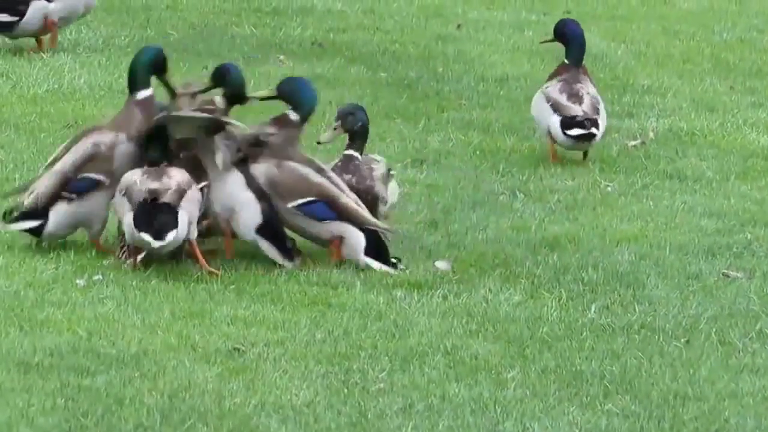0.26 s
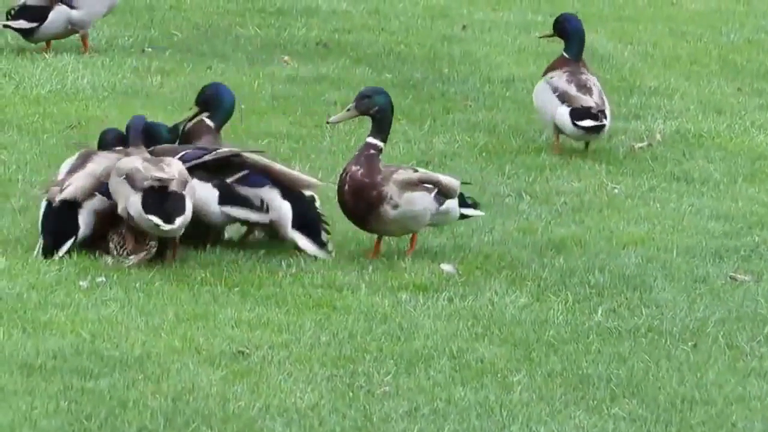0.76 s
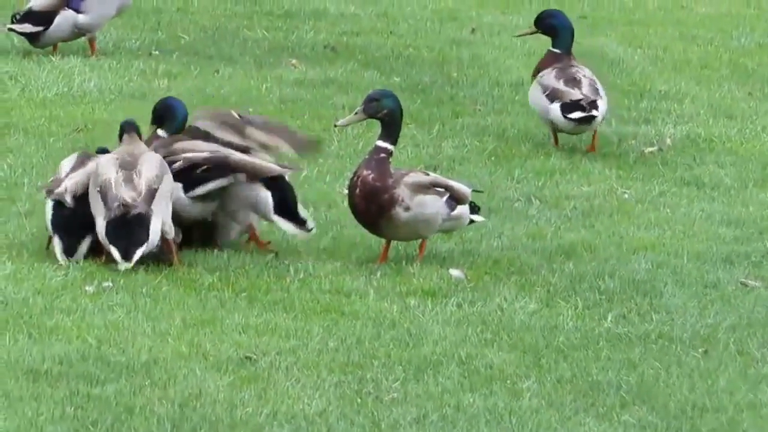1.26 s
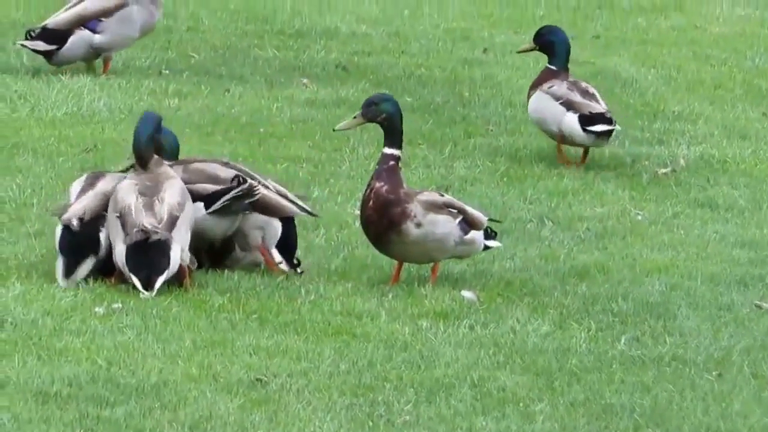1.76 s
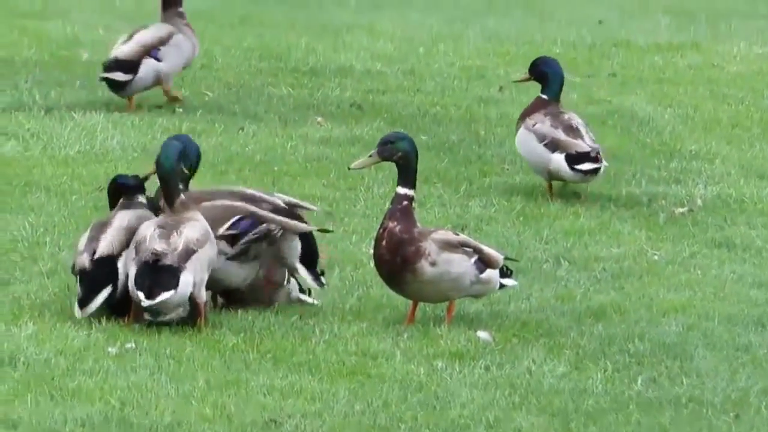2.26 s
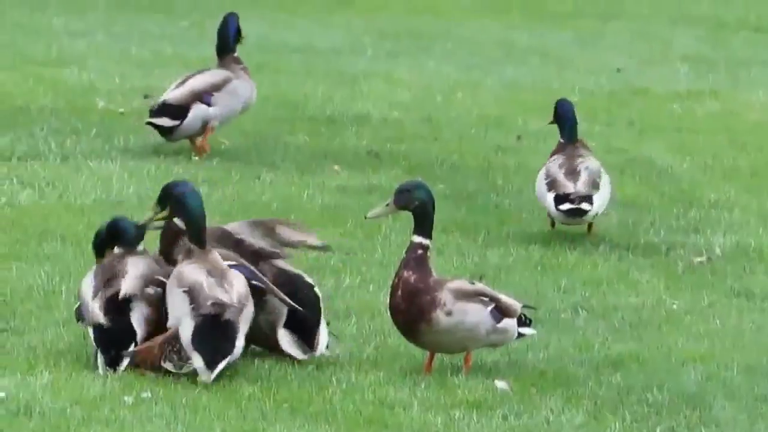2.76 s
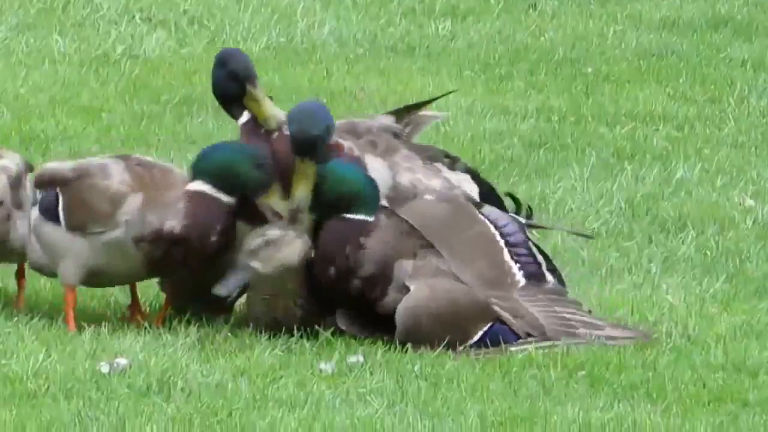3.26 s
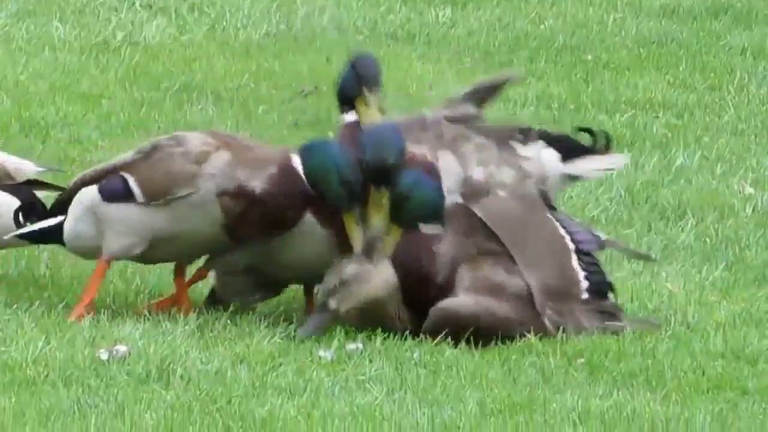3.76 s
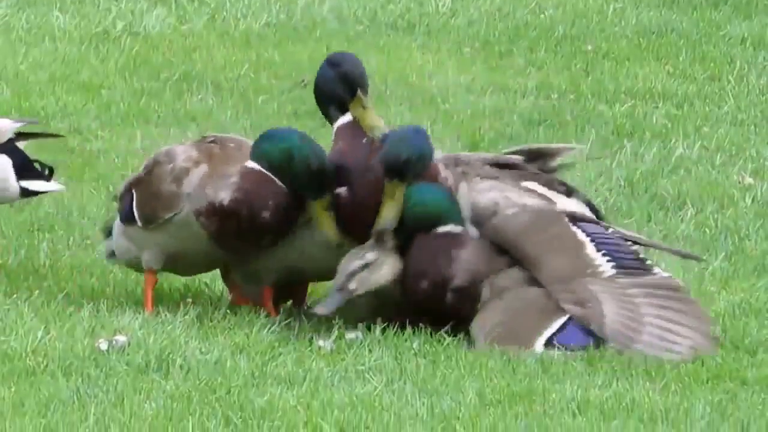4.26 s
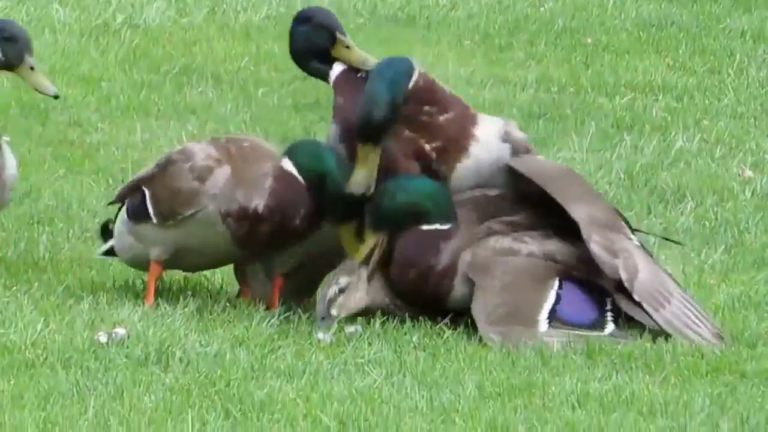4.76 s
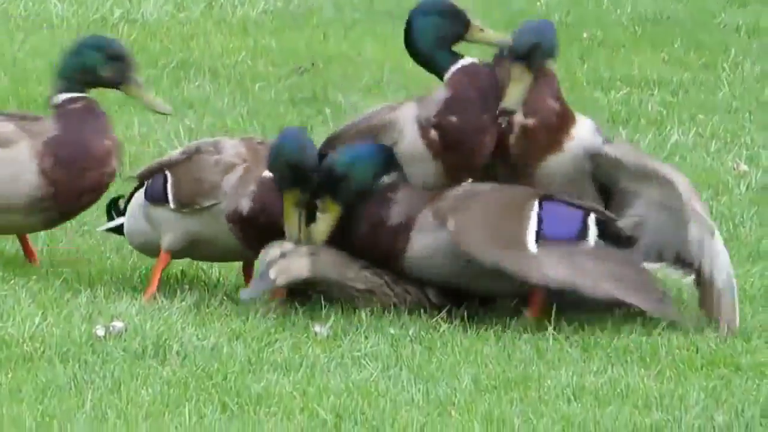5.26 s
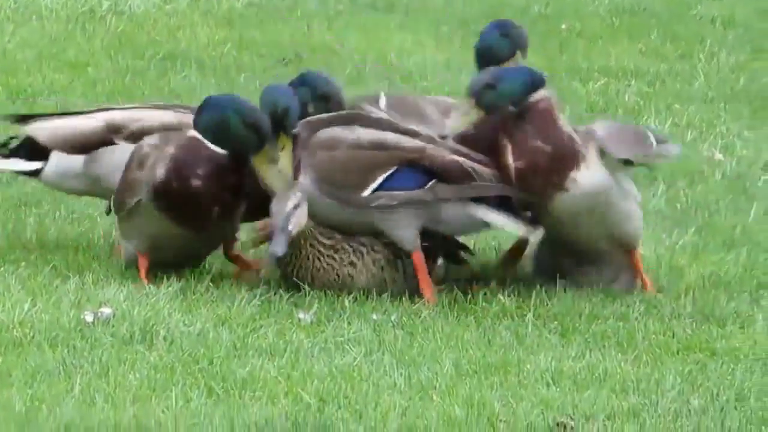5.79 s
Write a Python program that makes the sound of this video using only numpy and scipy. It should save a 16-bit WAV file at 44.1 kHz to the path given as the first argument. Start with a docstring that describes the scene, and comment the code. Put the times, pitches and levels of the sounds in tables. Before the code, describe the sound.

Outdoors on a lawn near traffic, a deep engine revs up, lets off with an exhaust boom and runs down while a second motor pulls steadily. Feathers flick and hoarse drakes rattle faintly. Halfway, an abrupt change brings quieter road wash, dull shoving of ducks, tiny chirps and twittering, swelling far motors, then a low call, a hollow bill snap and another call. Stereo microphone, animals soft beneath the traffic.

```python
"""A revving engine, a second one pulling steadily and road noise play over flicks of feathers.
The first engine eases off and booms through its exhaust; hoarse drake calls rattle faintly beside it.
At three seconds the scene jumps to a calmer moment: ducks shove, twitter and chirp on a lawn amid
tyre wash and droning motors; then a drake calls, a bill snaps and a last call follows.
Engines and motors are gliding sines, road and feathers are shaped noise, and calls are filtered pulses."""
import sys
import numpy as np
from scipy import signal
from scipy.fft import rfft, irfft, next_fast_len
from scipy.io import wavfile
from scipy.ndimage import uniform_filter1d, map_coordinates

SR = 44100
rng = np.random.default_rng(int(sys.argv[2]) if len(sys.argv) > 2 else 0)


def store_wav(level_fs):
    """Save 16-bit WAV to argv[1]."""
    pcm = np.round(np.clip(np.atleast_2d(level_fs), -1, 1) * 32767)
    wavfile.write(sys.argv[1], SR, pcm.T.astype(np.int16))


N = 265923

# the jump to the calmer moment, and the length of the blend around it
CUT_S, FADE_S = 2.99, .04

# Near engine. Its cycle rate climbs until the throttle lifts, then sags by a share and runs down
START_HZ, CLIMB_HZ_PER_S, LIFT_S, LIFT_TAKES_S = 24.2, 3.3, 1.15, .14
SAG_SHARE, RUN_DOWN_PER_S = .048, .287
# its lines before the exhaust: [multiple of the cycle rate, level under load/dB, level coasting/dB]
ENGINE_LINES = [(2, -36, -26), (3, -22.5, -19), (4, -36.5, -35), (5, -19, -21.5), (6, -30.5, -33.5),
                (7, -27, -33.5), (8, -12, -28), (10, -18, -40.5)]
# what the exhaust lets through: [f/Hz, gain/dB]
EXHAUST_GAIN = [(45, -23), (56, -10), (66, -5.5), (77, -2.5), (100, 1), (128, -3.5), (150, -10), (185, -20),
                (300, -35)]
# the exhaust booms on the third line as the throttle shuts: [start t/s, length t/s, extra level/dB]
EXHAUST_BOOM = (1.218, 0.34, 8.9)
# a short bark on every line but the third and fifth: [start t/s, length t/s, extra level/dB]
ENGINE_BARK = (2.275, 0.31, 7.1)
# the whole engine drops away for a moment: [start t/s, length t/s, change of level/dB]
ENGINE_LULL = (2.52, 0.2, -11.5)
AFTER_LULL_DB = 1  # a lasting lift that comes in during the lull

# Second engine: firing rate and level, each with its steady growth
PULL_HZ, PULL_HZ_PER_S, PULL_DB, PULL_GROWS_DB_PER_S = 63.2, 3.3, -25.5, 0.68
# it surges once: [start t/s, length t/s, extra level/dB]
PULL_SURGE_BUMP = (1.6, 0.15, 6.4)

# Rumble and tyres around the near engines, and the background hiss over them
# shapes of the noise: [f/Hz, relative level per Hz/dB]
NEAR_RUMBLE_SHAPE = [(15, -9.5), (33, -4.5), (80, 6.5), (140, 3), (220, -3), (255, -5), (320, -6),
                     (450, -14.5), (700, -32), (1500, -84)]
NEAR_TYRE_SHAPE = [(260, -33), (450, -6), (511, -6.5), (705, -2), (794, -1.5), (1040, -3.5), (1620, -8),
                   (1950, -12), (2390, -13.5), (3410, -19), (4430, -41), (7500, -120)]
NEAR_HISS_SHAPE = [(2800, -27.5), (3700, 8), (4800, 10), (5600, 6), (6400, -6), (7400, -5), (8500, -37.5),
                   (10000, -40.5), (12500, -47)]
NEAR_RUMBLE_DB, NEAR_TYRE_DB, NEAR_TYRE_DB_PER_S, NEAR_HISS_DB = -29, -38, -.5, -59
# the background hiss thins quickly and comes back slowly
DIP_S, DIP_FALL_S, DIP_RECOVER_S, DIP_DB = 1.2, 0.067, 1.5, -8

# Far motors that never stop: [f/Hz, level/dB]
STEADY_HUMS = [(38.8, -35), (819, -57.5)]
# far motors that swell and fade: [start t/s, length t/s, f/Hz, peak level/dB]
PASSING_DRONES = [(3.0, 3.2, 157, -42), (3.0, 1.66, 76, -38), (4.25, 0.5, 63, -28), (4.63, 0.7, 157, -27.7),
                  (4.697, 1.4, 70.4, -36), (4.747, 1.4, 195.7, -40), (4.85, 0.7, 378, -40.5),
                  (5.4, 0.62, 156.5, -30.3)]
MOTOR_WAVER_HZ, MOTOR_WAVER_DB = 1.3, 1

# Feather flicks: [middle t/s, peak level/dB, length t/s]
FEATHER_FLICKS = [(0.083, -56.5, 0.075), (0.721, -56.5, 0.024), (1.189, -63.5, 0.13), (1.778, -54, .057),
                  (2.554, -54, 0.043), (2.693, -58, 0.16), (2.83, -56, 0.032), (4.173, -61, 0.037),
                  (4.777, -59, 0.03), (5.326, -55, 0.024), (5.762, -57.5, 0.03), (5.862, -61.5, 0.017),
                  (5.898, -52.5, 0.029)]
# shape of the feather noise: [f/Hz, relative level per Hz/dB]
FEATHER_SHAPE = [(1000, -44), (2500, -9), (3500, -6.5), (5000, 4), (7000, 6.5), (9000, -2.5), (12000, -22)]
RUSTLE_DB, RUSTLE_SWING_DB, RUSTLES_PER_S = -65.5, 5, 30  # faint brushing after the cut

# Drake calls: [start t/s, length t/s, level/dB, pulse rate f/Hz, lower resonance f/Hz, upper resonance f/Hz]
DRAKE_CALLS = [(1.41, .14, -47.5, 89.3, 1750, 2300), (1.47, 0.16, -45.5, 72.2, 2050, 2750),
               (1.56, .085, -43.3, 105.6, 1630, 2450), (2.17, .2, -45, 76, 1870, 2400),
               (2.28, .17, -42.3, 83, 1900, 2380), (2.531, .06, -44, 102.8, 1880, 2000),
               (4.87, .16, -51.5, 70.7, 1750, 2180), (5.907, 0.13, -47, 66.4, 1460, 1740)]
THROAT_WIDTH_HZ = 520
# the short, faint echo: its level against the call, and the time it takes to fall by 60 dB
ECHO_DB, ECHO_T60_S = -10.5, 0.14

# Bouts of shoving: [start t/s, length t/s, peak level/dB]
SHOVES = [(2.96, .22, -36.5), (3.14, .22, -40), (3.6, .42, -38.5), (4.0, .45, -42)]
# shape of the plumage noise: [f/Hz, relative level per Hz/dB]
PLUMAGE_SHAPE = [(150, -27), (350, 1), (900, -0.5), (1400, -12), (2200, -19.5), (3100, -16), (4500, -33),
                 (8000, -61)]
SHOVE_GRAIN_DB, SHOVE_GRAINS_PER_S = 4.5, 90

# Road and hiss after the cut. Shapes of the noise: [f/Hz, relative level per Hz/dB]
CALM_DEEP_SHAPE = [(15, -21.5), (33, -3), (62, 1.5), (90, -3.5), (130, -3), (190, -10.5), (300, -24.5),
                   (800, -87)]
CALM_RUMBLE_SHAPE = [(90, -41), (160, -4.5), (205, 2), (250, -6.5), (295, -4), (360, -1.5), (480, -13.5),
                     (700, -24.5), (1500, -76.5)]
CALM_TYRE_SHAPE = [(260, -28), (450, -3), (807, -1.5), (1400, -8), (1780, -14), (2370, -14), (2640, -19.5),
                   (2950, -15.5), (3410, -20.5), (4430, -37), (7500, -120)]
LATE_TYRE_SHAPE = [(260, -32), (450, -17), (477, -7), (621, -2), (835, -3), (909, -4.5), (1300, -6.5),
                   (1870, -13.5), (3410, -21), (4430, -32), (7500, -120)]
CALM_HISS_SHAPE = [(2800, -16), (3700, 1), (4800, 1), (6300, -3.5), (7400, -2.5), (8300, -18), (10000, -25),
                   (12500, -49)]
CALM_RUMBLE_DB, CALM_TYRE_DB, CALM_TYRE_DB_PER_S, CALM_HISS_DB = -35, -37, -0.37, -56
# swells of the far traffic: [start t/s, length t/s, change of rumble level/dB, change of low tyre level/dB]
TRAFFIC_SWELLS = [(2.96, 0.3, 3, -3), (3.613, 0.31, 3.5, 2), (4.05, 0.65, -1.5, 0), (4.5, 0.35, -2, -0.5),
                  (4.78, 0.61, 2.5, 0), (5.55, 0.68, 1.5, 0.5)]
SWELL_TOP_HZ = 1400  # the air takes the treble out of the tyre swells

# Bouts of faint twittering: [start t/s, length t/s, peak level/dB]
CHATTER_BOUTS = [(3.5, .47, -53.5), (3.98, .5, -50.5)]
CHATTER_PER_S, CHATTER_SCATTER_DB = 280, 4
# resonances of the twittering: [f/Hz, width f/Hz, level/dB]
CHATTER_RESONANCES = [(2300, 1100, -0.5), (2930, 940, -1.5), (4480, 560, -8.5)]

# Short husky chirps: [middle t/s, peak level/dB, pitch f/Hz]
CHIRPS = [(3.666, -46, 2900), (3.827, -46, 2960), (3.843, -50, 3040), (3.858, -48, 2950),
          (3.922, -42.5, 3060), (3.955, -48, 3240), (4.126, -45, 2970), (4.301, -49, 3250)]
CHIRP_S, CHIRP_RISE_PER_S, CHIRP_WAVER = .012, 2.5, .07  # rise and waver are shares of the pitch

# A snap of a bill: [start t/s, level before attack and decay/dB, f/Hz, time to fall by 60 dB t/s]
BILL_SNAP = (5.6395, -16.5, 1380, .014)
SNAP_ATTACK_S = .002

# How alike left and right are in the noise: [f/Hz, likeness from 0 to 1]
STEREO_LIKENESS = [(30, .9), (120, .95), (300, .83), (700, .77), (1500, .76), (3000, .64), (4300, .36),
                   (6000, .28), (9000, .12)]
# how much louder left is than right: [f/Hz, level difference/dB]
LEFT_LEAN = [(60, 1.55), (200, 1.5), (700, 1), (1400, -1), (3000, 0), (5500, -2), (9000, 0.5)]
# narrow dips of the microphone: [f/Hz, width f/Hz, depth from 0 to 1]
MICROPHONE_DIPS = [(3950, 140, .76), (7880, 130, .75)]
TOP_HZ = 12300  # nothing is kept from here up


def amp(db):
    """Turn decibels into gain."""
    return 10 ** (np.asarray(db) / 20)


def unit(x):
    """Scale to an average (rms) strength of 1."""
    return x / np.sqrt(np.mean(x ** 2) + 1e-20)


def clock():
    """The time of every sample in seconds."""
    return np.arange(N) / SR


def ramp(start, length):
    """A straight rise from 0 to 1."""
    return np.clip((clock() - start) / length, 0, 1)


def swell(start, length):
    """A rounded rise and fall, from 0 to 1 and back."""
    return np.sin(np.pi * np.clip((clock() - start) / length, 0, 1))


def bump(start, length, db):
    """A passing change of level in dB."""
    return db * swell(start, length)


def along(points, hz):
    """Read a curve of (Hz, value) points on a log frequency axis."""
    f, v = np.transpose(points)
    return np.interp(np.log(hz + 1), np.log(f + 1), v)


def wobble(rate):
    """A smooth random curve through `rate` random points a second."""
    points = rng.standard_normal(int(N * rate / SR) + 4)
    return map_coordinates(points, [np.arange(N) * rate / SR])


def filtered(x, response):
    """Filter x by a gain that depends on frequency."""
    m = next_fast_len(N + SR // 2)  # spare room so the end does not wrap round to the start
    return irfft(rfft(x, m) * response(np.fft.rfftfreq(m, 1 / SR)), m)[..., :N]


def resonance(f, hz, width_hz):
    """A hollow such as a throat favours one pitch and falls off steeply on both sides."""
    damping = 1j * f * width_hz
    return (damping / (hz * hz - f * f + damping)) ** 2


def tone(hz):
    """A sine of rms 1 on a moving pitch, with a random starting phase."""
    return np.sqrt(2) * np.sin(2 * np.pi * (np.cumsum(hz) / SR + rng.random()))


def rush(spectrum, patchy_db):
    """Stereo noise, its shared part at rms 1, in patches of random gain; the bass is nearly mono."""
    z = signal.stft(rng.standard_normal((2, N)), nperseg=512)[2]
    field = uniform_filter1d(rng.standard_normal(z.shape[1:]), size=6, axis=0)  # smooth over pitch
    field = uniform_filter1d(field, size=14, axis=1)  # smooth over time
    pair = signal.istft(z * amp(patchy_db * unit(field)), nperseg=512)[1][:, :N]

    def shape(hz):
        # a wider angle puts more into the difference of left and right
        angle = np.arccos(np.clip(along(STEREO_LIKENESS, hz), -1, 1)) / 2
        return amp(along(spectrum, hz)) * [np.cos(angle), np.sin(angle)]

    mid, side = filtered(pair, shape)
    return np.array([mid + side, mid - side]) / np.sqrt(np.mean(mid ** 2))


def near_engine():
    """Uneven firing puts lines on many multiples of the cycle rate; they glide through a fixed exhaust."""
    t, coasting = clock(), ramp(LIFT_S, LIFT_TAKES_S)
    climb_hz = START_HZ + CLIMB_HZ_PER_S * np.minimum(t, LIFT_S)
    run_down = np.exp(-RUN_DOWN_PER_S * np.maximum(t - LIFT_S, 0))
    cycle_hz = climb_hz * (1 - SAG_SHARE * coasting) * run_down
    flutter_db = .7
    strong = {3: bump(*EXHAUST_BOOM), 5: 0}
    bark_db, out = bump(*ENGINE_BARK), np.zeros(N)
    for multiple, load_db, coast_db in ENGINE_LINES:
        line_hz = multiple * cycle_hz
        db = load_db + (coast_db - load_db) * coasting
        db = db + along(EXHAUST_GAIN, line_hz) + strong.get(multiple, bark_db)
        out += amp(db + flutter_db * wobble(17)) * tone(line_hz)
    lull_start, lull_length, _ = ENGINE_LULL
    return amp(bump(*ENGINE_LULL) + AFTER_LULL_DB * ramp(lull_start, lull_length)) * out


def second_engine():
    """A slowly climbing and growing exhaust note; its octave is strong under load early on."""
    hz = PULL_HZ + PULL_HZ_PER_S * clock()
    octave = amp(-26.5) + amp(-9.0) * swell(-0.28, 1.7)
    flutter_db = .7 * wobble(5)
    level_db = PULL_DB + PULL_GROWS_DB_PER_S * clock() + bump(*PULL_SURGE_BUMP) + flutter_db
    return amp(level_db) * (tone(hz) + octave * tone(2 * hz))


def road_near():
    """Rumble and tyre roar around the engines, and a background hiss, are three bands of noise."""
    rumble = amp(NEAR_RUMBLE_DB) * rush(NEAR_RUMBLE_SHAPE, patchy_db=0.03)
    tyre_db = NEAR_TYRE_DB + NEAR_TYRE_DB_PER_S * clock()
    tyres = amp(tyre_db) * rush(NEAR_TYRE_SHAPE, patchy_db=1.0)
    dip_db = DIP_DB * ramp(DIP_S, DIP_FALL_S) * (1 - ramp(DIP_S + DIP_FALL_S, DIP_RECOVER_S))
    hiss = rush(NEAR_HISS_SHAPE, patchy_db=1.5) * amp(1.2 * wobble(35))
    return rumble + tyres + amp(NEAR_HISS_DB + dip_db) * hiss


def far_motors():
    """Distant tones waver slightly in pitch and strength on their way through the air."""
    def motor(hz, db):
        return amp(db + MOTOR_WAVER_DB * wobble(8)) * tone(hz + MOTOR_WAVER_HZ * wobble(6))

    hums = sum(motor(hz, db) for hz, db in STEADY_HUMS)
    drones = sum(swell(start, length) * motor(hz, db) for start, length, hz, db in PASSING_DRONES)
    return hums + drones


def feathers(grain_db=2.5):
    """Wings brush against each other in short grainy strokes, with fainter chance ones after the cut."""
    strokes = sum(amp(db) * swell(middle - length / 2, length) for middle, db, length in FEATHER_FLICKS)
    rustle = ramp(CUT_S, FADE_S) * amp(RUSTLE_DB + RUSTLE_SWING_DB * wobble(RUSTLES_PER_S))
    brush = rush(FEATHER_SHAPE, patchy_db=1)
    return (strokes + rustle) * unit(brush * amp(grain_db * wobble(640)))


def drakes():
    """Each call is a short rattle of slow, uneven pulses and gated air through two throat resonances."""
    air_share, jitter, scatter_db = .56, .1, 1.5
    out = np.zeros(N)
    for start, length, db, pulse_hz, low_hz, high_hz in DRAKE_CALLS:
        cycles = np.cumsum(pulse_hz * (1 + jitter * wobble(60))) / SR
        cycles -= np.interp(start + length / 2, clock(), cycles)  # puts a pulse in mid-call
        clicks = np.diff(np.floor(cycles), prepend=np.floor(cycles[0]))
        pulses = unit(clicks * amp(scatter_db * wobble(90)))
        air = unit(rng.standard_normal(N) * np.exp(-2.5 * (cycles % 1)))  # fades after each pulse

        def throat(f):
            upper = resonance(f, high_hz, THROAT_WIDTH_HZ)
            return resonance(f, low_hz, THROAT_WIDTH_HZ) + amp(-3.0) * upper

        voice = unit(filtered(pulses * (1 - air_share) + air * air_share, throat))
        out += amp(db) * swell(start, length) * voice
    return out


def surroundings(x):
    """Calls come back faintly and blurred from the surroundings, differently in each ear."""
    t = np.arange(SR // 4) / SR
    tail = rng.standard_normal((2, len(t))) * amp(-60 * t / ECHO_T60_S)
    tail /= np.linalg.norm(tail, axis=1, keepdims=True)
    return x + amp(ECHO_DB) * signal.fftconvolve(x[None], tail, axes=1)[:, :N]


def tussle():
    """Bodies and wings shove against each other in bouts of dull, uneven brushing."""
    grain = amp(SHOVE_GRAIN_DB * wobble(SHOVE_GRAINS_PER_S))
    bouts = sum(amp(db) * swell(start, length) for start, length, db in SHOVES)
    return bouts * unit(grain * rush(PLUMAGE_SHAPE, patchy_db=1.5))


def road_calm():
    """Traffic farther off: a steady deep rumble under a wash whose low part swells with passing cars."""
    patchy_db = .5
    rumble_db = CALM_RUMBLE_DB + sum(bump(start, length, db) for start, length, db, _ in TRAFFIC_SWELLS)
    surge = amp(sum(bump(start, length, db) for start, length, _, db in TRAFFIC_SWELLS))
    deep = amp(-27.5) * rush(CALM_DEEP_SHAPE, patchy_db=0)
    rumble = deep + amp(rumble_db) * rush(CALM_RUMBLE_SHAPE, patchy_db)
    # the tyre wash slowly changes from one tone colour to another
    late = ramp(3.83, 1.24)
    wash = np.sqrt(1 - late) * rush(CALM_TYRE_SHAPE, patchy_db)
    wash = wash + np.sqrt(late) * rush(LATE_TYRE_SHAPE, patchy_db)
    low_wash = filtered(wash, lambda hz: 1 / (1 + (hz / SWELL_TOP_HZ) ** 4))
    wash = wash + (surge - 1) * low_wash
    tyres = amp(CALM_TYRE_DB + CALM_TYRE_DB_PER_S * (clock() - CUT_S)) * wash
    hiss = amp(CALM_HISS_DB - 0.87 * late) * rush(CALM_HISS_SHAPE, patchy_db)
    return rumble + tyres + hiss


def chatter():
    """Bouts of faint twittering: ticks at random moments ring through a few resonances."""
    ticks = (rng.random(N) < CHATTER_PER_S / SR) * amp(CHATTER_SCATTER_DB * rng.uniform(-1, 1, N))

    def throat(f):
        return sum(amp(db) * resonance(f, hz, width) for hz, width, db in CHATTER_RESONANCES)

    voice = unit(filtered(ticks, throat))
    return voice * sum(amp(db) * np.sqrt(np.abs(swell(start, length))) for start, length, db in CHATTER_BOUTS)


def chirps():
    """Tiny notes, each rising a little, made husky by a fast waver in pitch."""
    out = np.zeros(N)
    for middle, db, hz in CHIRPS:
        rise = CHIRP_RISE_PER_S * np.clip(clock() - middle, -CHIRP_S, CHIRP_S)
        glide = 1 + rise + CHIRP_WAVER * wobble(900)
        out += amp(db) * swell(middle - CHIRP_S / 2, CHIRP_S) * tone(hz * glide)
    return out


def bill_snap():
    """A bill snaps shut with one short, hollow tock: a sine that starts fast and dies away."""
    start, db, hz, t60 = BILL_SNAP
    age = np.maximum(clock() - start, 0)
    attack = 1 - np.exp(-age / SNAP_ATTACK_S)
    return amp(db - 60 * age / t60) * attack * np.sin(2 * np.pi * hz * age)


def scene():
    """Blend the two road moments across the cut, add the ducks and motors, and lean the stereo by pitch."""
    after = ramp(CUT_S - FADE_S / 2, FADE_S)
    near = near_engine() + second_engine() + road_near()
    traffic = np.sqrt(1 - after) * near + np.sqrt(after) * road_calm()
    voices = surroundings(drakes() + chatter() + chirps() + bill_snap())
    lawn = traffic + far_motors() + feathers() + voices + tussle()
    return filtered(lawn, lambda hz: amp(np.outer([.5, -.5], along(LEFT_LEAN, hz))))


def record(dry):
    """The microphone has narrow dips, and nothing above a top frequency is kept."""
    def response(hz):
        dips = [1 - depth * np.exp(-((hz - centre) / width) ** 2) for centre, width, depth in MICROPHONE_DIPS]
        return np.prod(dips, axis=0) * (hz < TOP_HZ)

    return filtered(dry, response)


dry = scene()
out = record(dry)
store_wav(out)
```